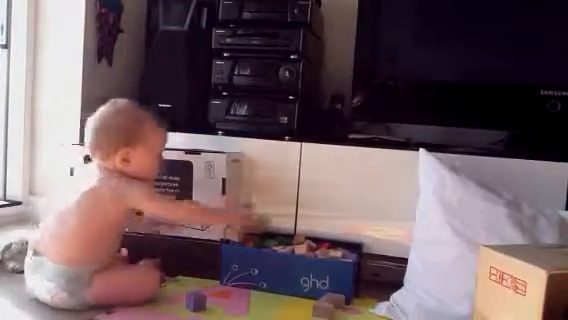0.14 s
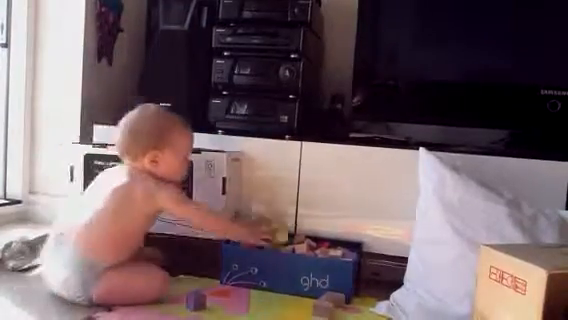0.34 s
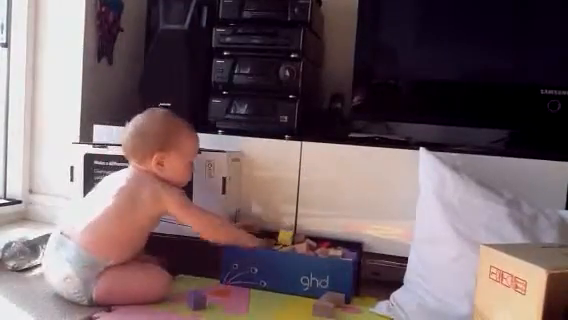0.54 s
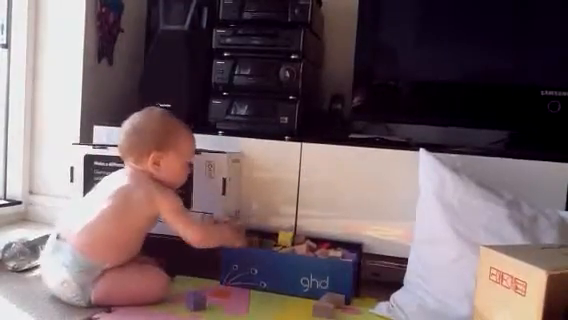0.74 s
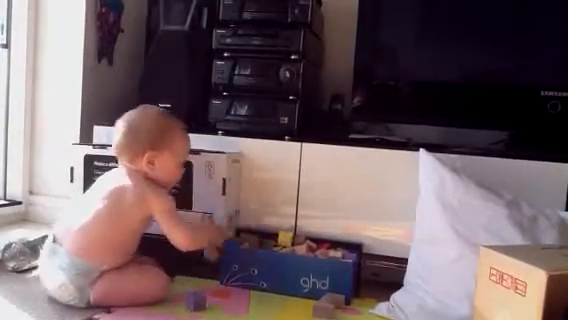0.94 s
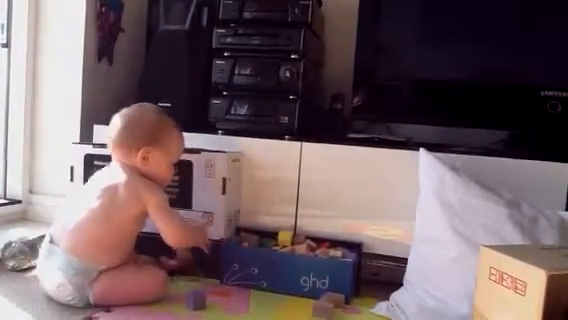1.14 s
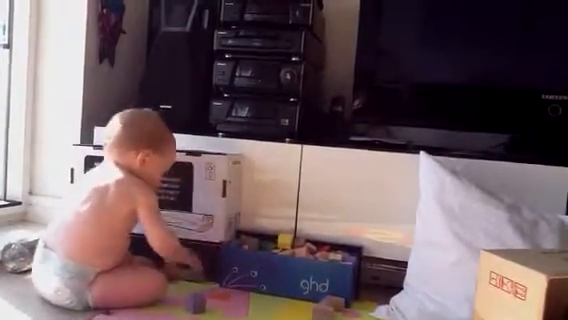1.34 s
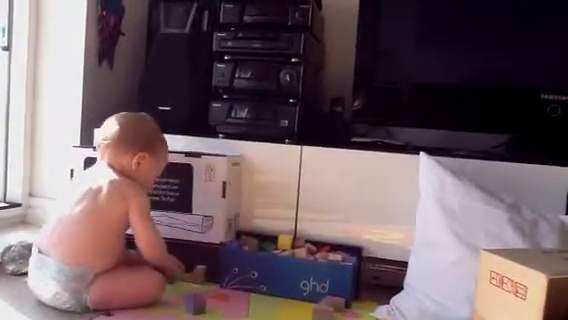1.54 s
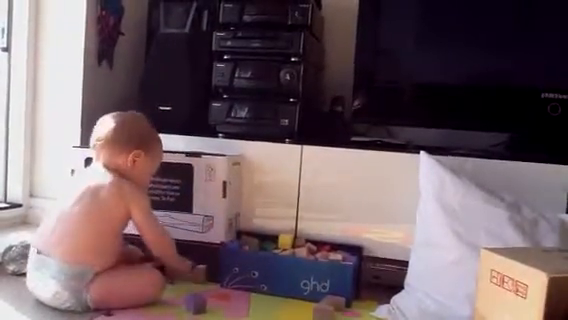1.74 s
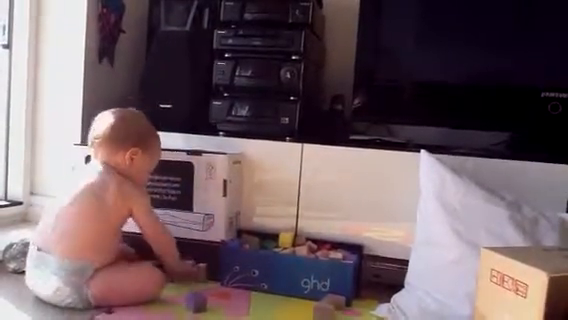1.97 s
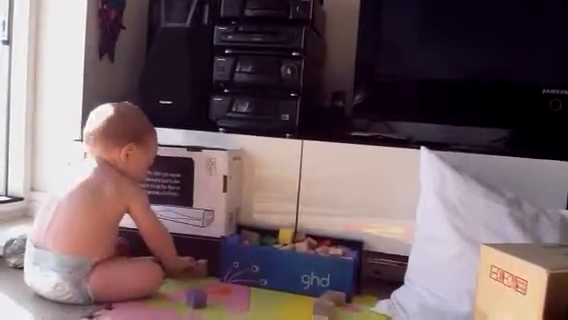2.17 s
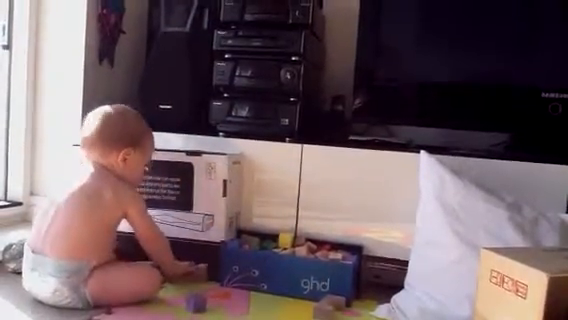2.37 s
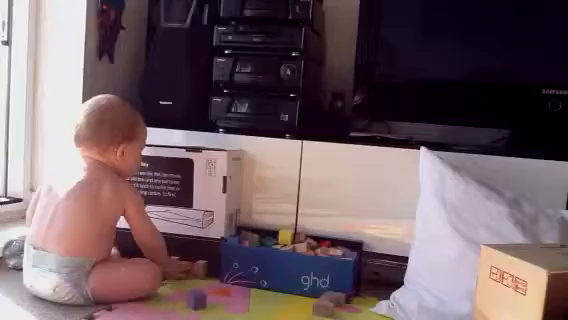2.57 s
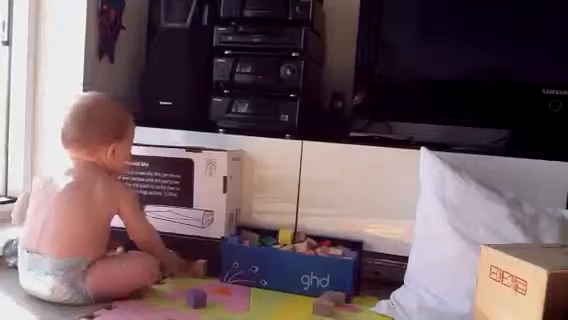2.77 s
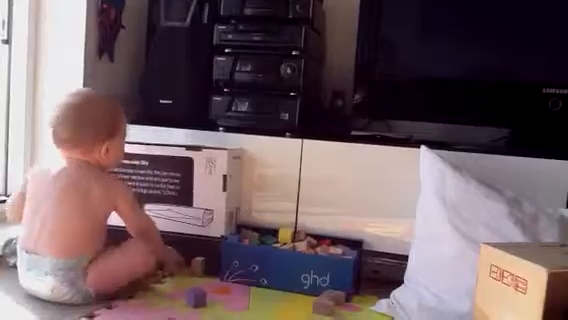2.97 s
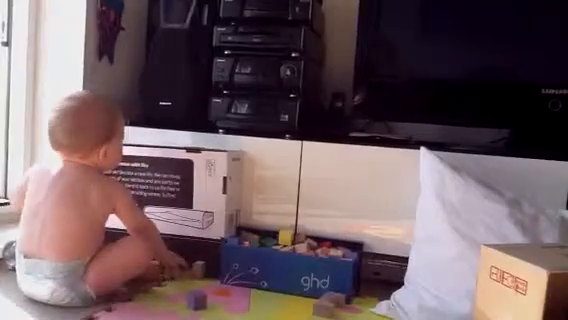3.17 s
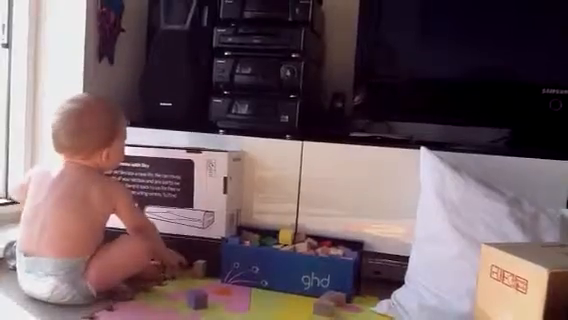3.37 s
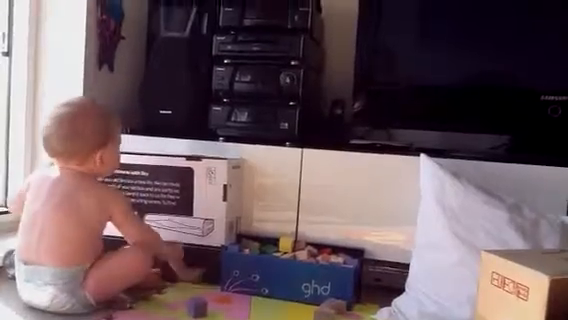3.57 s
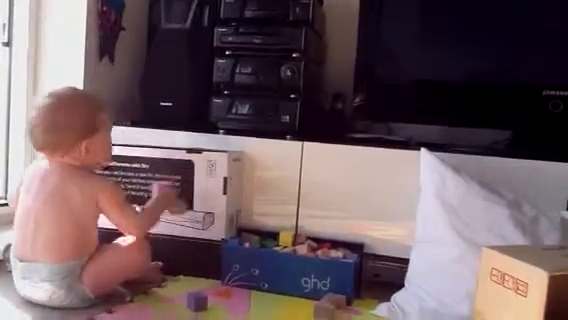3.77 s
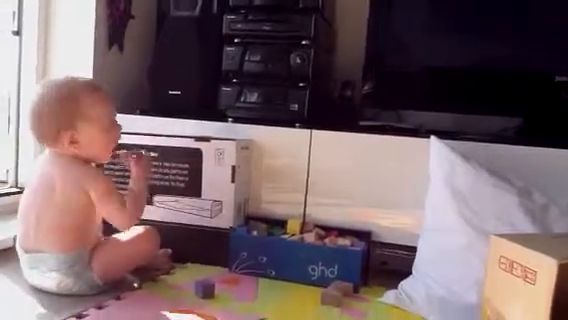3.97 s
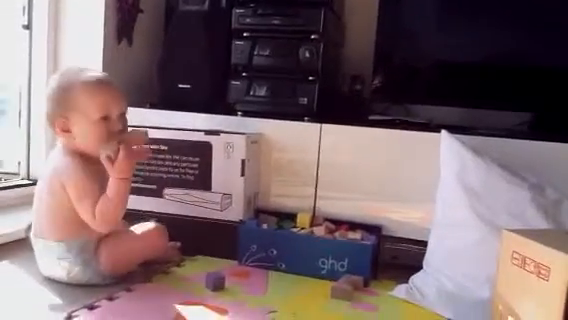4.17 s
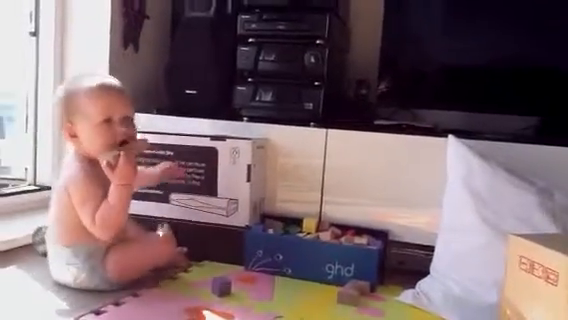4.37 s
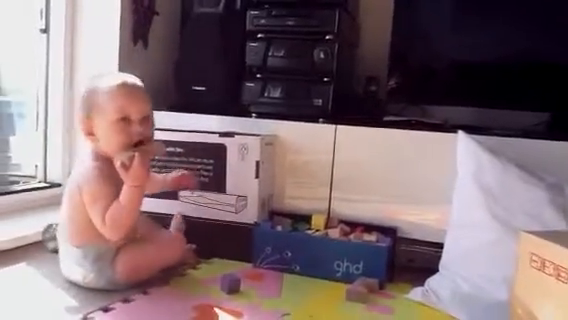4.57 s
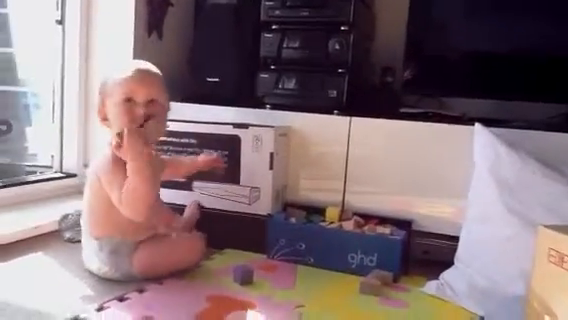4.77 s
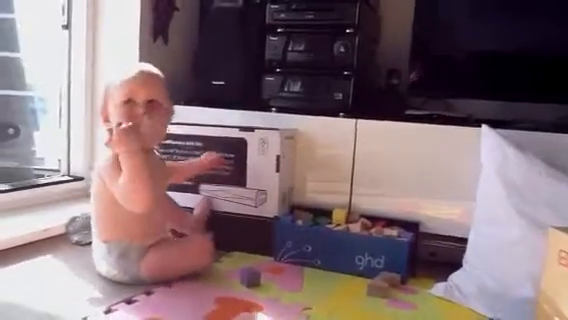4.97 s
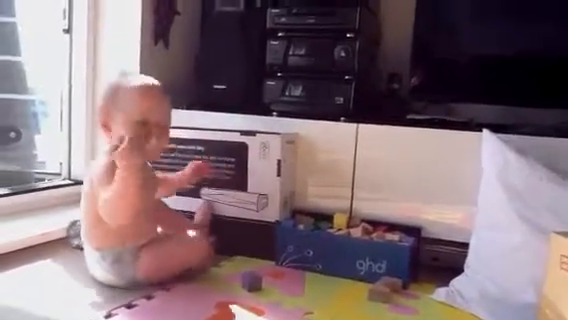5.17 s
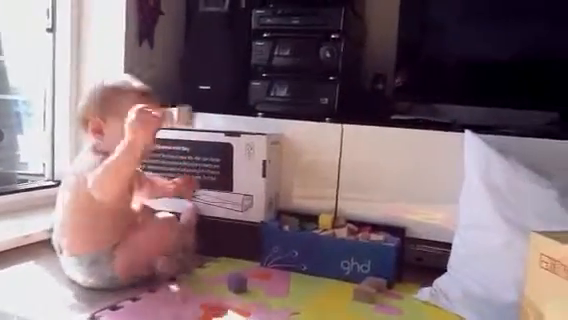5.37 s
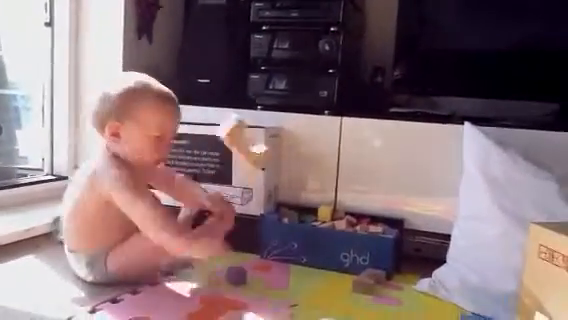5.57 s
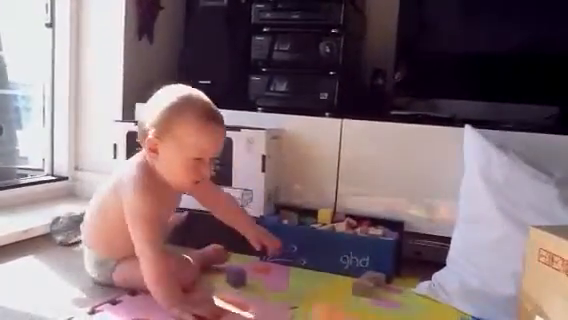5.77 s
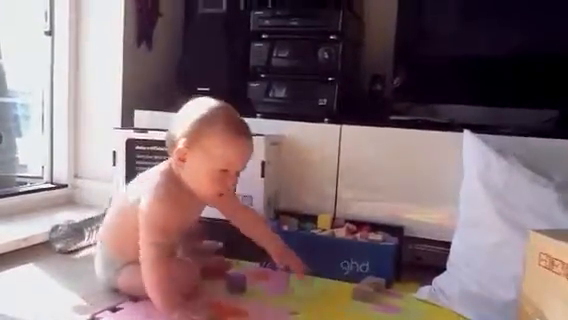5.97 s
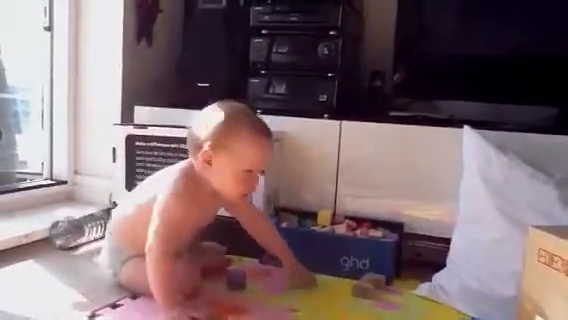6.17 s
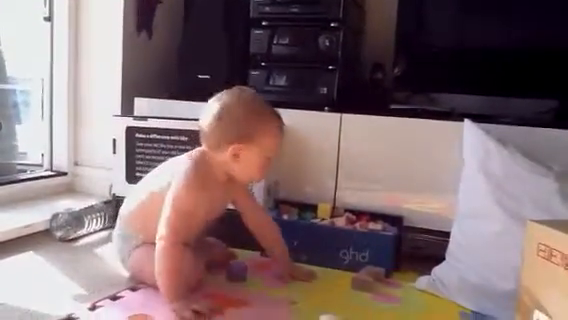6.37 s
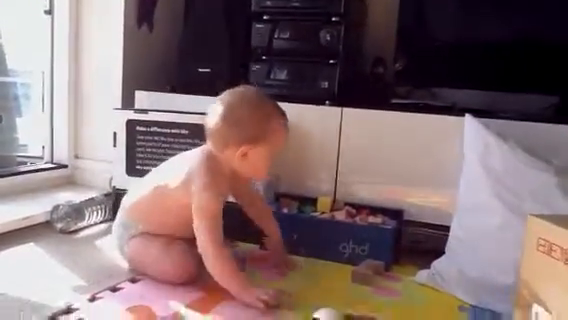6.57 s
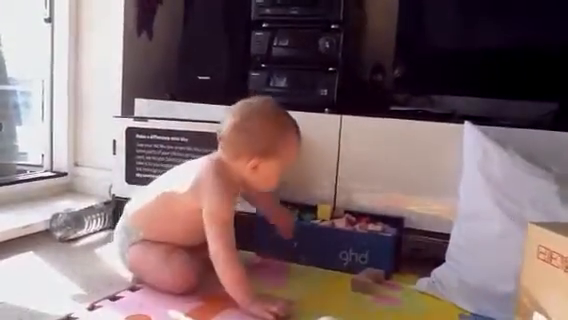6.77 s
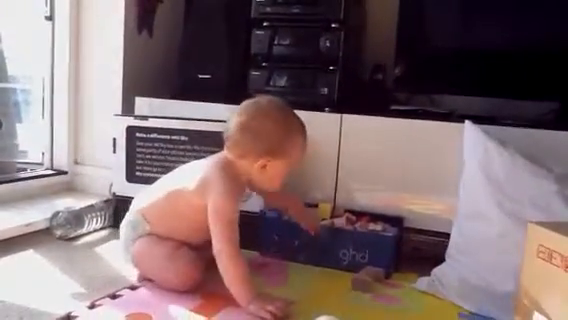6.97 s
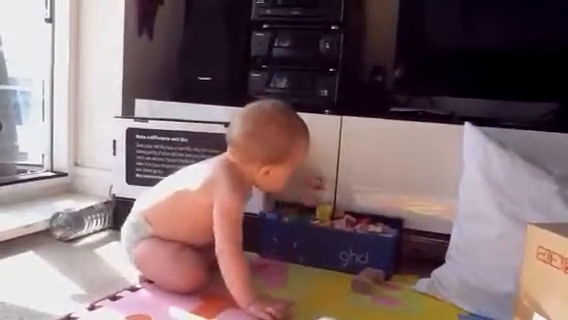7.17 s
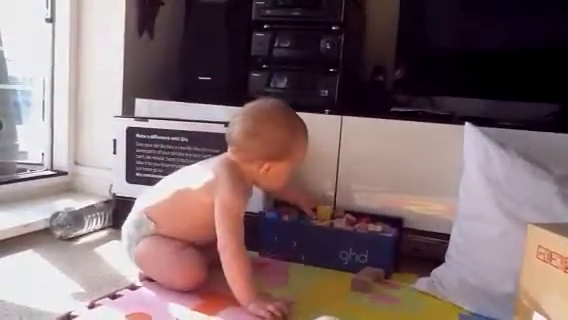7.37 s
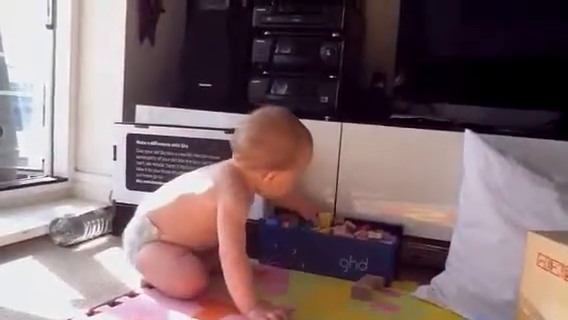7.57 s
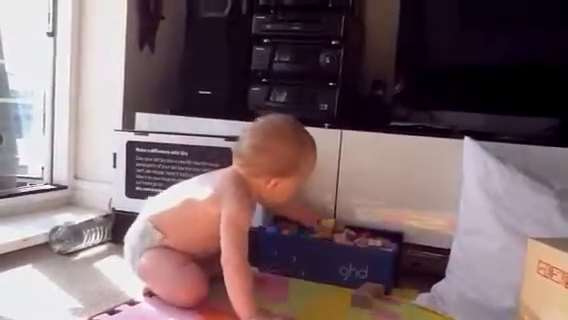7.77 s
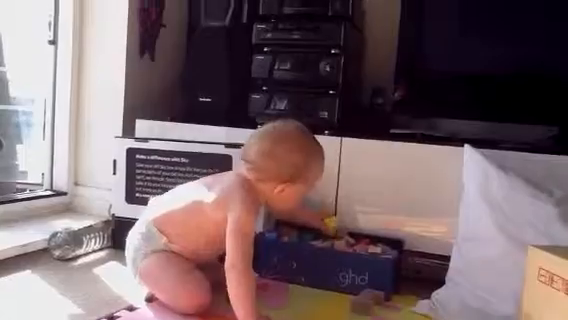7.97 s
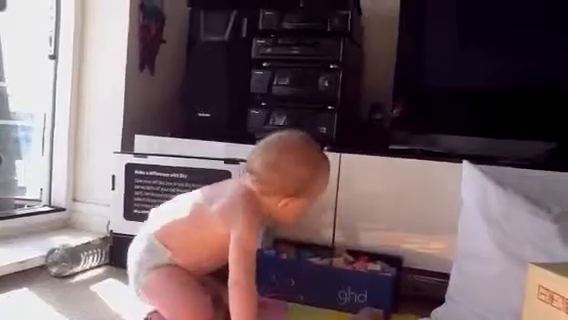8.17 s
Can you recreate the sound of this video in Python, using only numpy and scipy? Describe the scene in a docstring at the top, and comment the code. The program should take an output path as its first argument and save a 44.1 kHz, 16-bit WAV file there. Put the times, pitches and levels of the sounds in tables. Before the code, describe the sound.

Faint, slightly wavering room noise runs throughout, mono, from one small microphone in a furnished living room with a short diffuse tail. At 0.35 s a block knocks into a cardboard box with a hollow thud and a small settling rattle; light taps follow. Soft sliding and low bumps at 0.9-1.4 s lead to a sharp, bright crack at 1.5 s. From 2.0 to 3.8 s blocks are stirred busily, clicking in uneven clusters, strongest near 2.85 and 3.44 s, over muffled box rumble. A scuff and dull knock at 4.0 s give way to near silence, with barely audible rubbing. At 5.4 s a scrape and thud restart the play; hard clacks cluster at 5.5-5.85 s and peak, bright and dense, around 6.0 s. Rattling and crisp knocks continue until 7.45 s, then brief rubbing and duller, sparser knocks into the box to about 8.1 s.

```python
"""Faint, wavering room noise, then small wooden blocks pushed about, picked up and dropped
in a cardboard box and on a foam play mat. Blocks knock in very short clicks of decaying sines;
box and mat answer with low thuds. The shoved heap rattles and rumbles as grains in resonators;
hands and legs slide as filtered noise. A furnished living room rings on behind as a diffuse tail.
One small microphone feeds both channels."""
import sys
import numpy as np
from scipy import signal
from scipy.fft import rfft, irfft
from scipy.io import wavfile

SR = 44100
rng = np.random.default_rng(int(sys.argv[2]) if len(sys.argv) > 2 else 0)


def wrap_up_sound(samples):
    """Save the sound to the file named by the first command line argument, as 16-bit audio."""
    columns = np.atleast_2d(samples).T
    # keep every value between -1 and 1, then stretch to whole-number steps
    tamed = np.clip(columns, -1, 1)
    steps = np.round(tamed * 32767).astype(np.int16)
    wavfile.write(sys.argv[1], SR, steps)


N = 362502

# Block on block. Each row: time in seconds, dry peak in dB, base pitch in Hz,
# treble in dB (edge modes relative to body modes).
BLOCK_KNOCKS = [(0.2107, -32, 1940, -25), (0.3443, -11, 3850, -40), (0.3564, -22, 3970, -38),
                (0.3629, -22, 1500, -35), (0.3694, -21.5, 3950, -32), (0.4815, -29, 1650, -19),
                (0.8116, -43, 1540, -25), (0.9774, -30, 1620, -26), (1.3824, -22.5, 1330, -27),
                (1.5247, -4, 3300, -5), (1.5292, -9, 2900, -14), (1.5410, -19, 3000, -8),
                (1.5504, -19, 1705, -22), (1.6405, -30, 2500, -25), (1.7753, -32, 3280, -32),
                (1.7958, -31, 3150, -32), (1.851, -42, 3730, -36), (1.8884, -38, 3280, -36),
                (1.9407, -34.5, 2600, -24), (1.9762, -27, 2550, -26), (2.0018, -25, 3000, -21),
                (2.0357, -13.5, 2100, -14.5), (2.0424, -21, 2240, -16), (2.052, -14, 2180, -5),
                (2.0633, -18, 2510, -6), (2.0684, -19, 2710, -18), (2.0744, -17.5, 2880, -30),
                (2.1209, -13.5, 2310, -18), (2.1334, -11, 3000, -24), (2.1887, -18, 2470, -18),
                (2.2029, -11, 4080, -18), (2.2072, -14.5, 2500, -15), (2.2209, -13, 2490, -11),
                (2.2464, -24, 3140, -24), (2.2675, -11.5, 2220, -13), (2.384, -26, 2120, -25),
                (2.443, -25.5, 1310, -39), (2.5041, -24.5, 2050, -27), (2.5237, -22.5, 2200, -32),
                (2.5334, -21.5, 2200, -26), (2.589, -23, 2200, -30), (2.6028, -19, 2600, -37),
                (2.611, -19, 2150, -30), (2.6764, -13, 2530, -41), (2.7034, -12.5, 2730, -24),
                (2.7498, -23, 2500, -33), (2.8474, -7, 2300, -25), (2.8699, -7.5, 2000, -16),
                (2.8846, -10, 3680, -18), (2.8892, -11, 2230, -33), (2.9014, -19.5, 1910, -20),
                (2.9397, -18, 1810, -13), (3.109, -22.5, 2560, -34), (3.1406, -13.5, 4650, -27),
                (3.1589, -17, 2720, -21), (3.1837, -22, 2150, -29), (3.2123, -27, 3490, -23),
                (3.2268, -16.5, 3240, -22), (3.249, -9, 2160, -40), (3.2654, -17, 2010, -30),
                (3.2744, -17, 2000, -25), (3.2951, -20.5, 2480, -25), (3.373, -25, 1850, -32),
                (3.4176, -14, 1780, -26), (3.4274, -11.5, 2060, -28), (3.4334, -12, 2120, -18),
                (3.4407, -3.5, 3500, -12), (3.4499, -7.5, 2440, -8), (3.4624, -15, 1940, -30),
                (3.4675, -9.5, 2030, -30), (3.4734, -14.5, 2120, -29), (3.5226, -20.5, 1800, -13),
                (3.576, -25, 2180, -29), (3.6386, -15, 1940, -38), (3.6454, -18.5, 3300, -36),
                (3.7137, -12.5, 3600, -34), (3.7409, -26, 1800, -31), (3.7519, -28, 2900, -38),
                (3.7713, -23, 2630, -33.5), (3.7853, -23, 3620, -49), (3.8182, -27, 2030, -40),
                (4.0427, -13, 1500, -26), (5.3646, -23, 1450, -22), (5.4504, -34, 2160, -24),
                (5.5064, -8.5, 3570, -24.5), (5.5205, -17, 3250, -16), (5.574, -12.5, 3530, -30),
                (5.5815, -25.5, 1980, -25), (5.6035, -19, 2860, -27), (5.6817, -25, 1950, -34),
                (5.7249, -30, 5000, -12), (5.7388, -20, 2280, -36), (5.7535, -4.5, 2170, -25),
                (5.7552, -7, 2730, -17), (5.7684, -13, 2680, -27), (5.7738, -12, 2820, -26),
                (5.7793, -10.5, 2610, -30), (5.7984, -19, 2180, -14), (5.8074, -19, 3000, -12),
                (5.821, -14, 2300, -26), (5.8331, -9, 2560, -23), (5.8384, -14, 2870, -23),
                (5.8434, -19, 3010, -33), (5.8524, -17, 1890, -27), (5.8564, -17, 2620, -32),
                (5.8614, -22, 1890, -28), (5.9604, -23, 3200, -12), (5.9702, -11, 3600, -13),
                (5.982, -11, 2870, -11), (5.9985, -14, 2700, -25), (6.0063, -10, 4300, -12),
                (6.0128, -11, 2840, -3), (6.0198, -6, 3000, -14), (6.0305, -2.5, 3000, -9),
                (6.0424, -5, 3600, -13), (6.051, -12, 3400, -14), (6.069, -18, 3240, -14),
                (6.2104, -24, 3560, -22), (6.2147, -18, 3430, -19), (6.228, -15, 4230, -6),
                (6.2374, -16, 2400, -12), (6.241, -9.5, 3670, -14), (6.2454, -16, 3530, -13),
                (6.2544, -18, 3500, -21), (6.3018, -8, 3380, -10.5), (6.3734, -26, 2470, -25),
                (6.3863, -23.5, 3750, -19), (6.4178, -26, 2520, -27), (6.4228, -14, 3600, -35),
                (6.4354, -22, 2930, -14), (6.5061, -19, 4180, -12), (6.5485, -24.5, 2440, -17),
                (6.5859, -19, 2860, -18.5), (6.6763, -17, 3600, -37), (6.6844, -23, 3680, -24),
                (6.7306, -25, 1890, -17), (6.791, -22, 3300, -21), (6.8064, -16.5, 3470, -21),
                (6.8154, -22, 2690, -17), (6.8551, -15, 3800, -20), (6.8648, -14.5, 3500, -3),
                (6.8696, -12.5, 5200, -4), (6.8836, -12.5, 3930, -29), (6.9443, -18, 4600, -12),
                (7.008, -13.5, 3240, -17), (7.0868, -26, 2200, -33), (7.1496, -26, 3050, -22),
                (7.1803, -12.5, 2930, -3), (7.1862, -19, 2500, -20), (7.2164, -18.5, 5280, -12),
                (7.2777, -18, 2800, -33), (7.2824, -15.5, 2500, -28), (7.2862, -18, 3300, -12),
                (7.2918, -10.5, 2340, -14), (7.2972, -15, 3660, -22), (7.3494, -24, 4500, -23),
                (7.4081, -16.5, 3120, -34), (7.4345, -21, 2200, -18), (7.4434, -21.5, 2270, -32),
                (7.6164, -31, 1780, -36), (7.6862, -23, 1460, -27), (7.6994, -28, 1410, -31),
                (7.7989, -21.5, 1900, -31), (7.8386, -31, 1610, -28.5), (7.873, -25, 1630, -33),
                (7.897, -18.5, 3000, -37), (7.9064, -21, 2970, -33), (7.9423, -12.5, 3300, -34),
                (7.982, -22, 3840, -22), (7.998, -24, 2020, -30), (8.0083, -15.5, 2070, -33),
                (8.0676, -31, 1670, -37), (8.1279, -37.5, 2070, -29)]
# Thickness modes of the wood, woken by hard contacts. Each row: mean frequency in Hz, relative level in dB.
EDGE_MODES = [(4900, -1), (5800, 3), (6700, -4), (8300, 3.5), (9500, -2), (11700, 4), (14300, -1.5)]
# As the play moves about. Each row: time in seconds, room send in dB,
# ringing freedom as a factor (1 usual, less when held down on foam).
PLAY_PLACES = [(0, 4.5, 1.2), (1.76, 0, 1.1), (2.0, 6, 1.2), (2.4, 0.5, .95), (3.55, -1.5, .95),
               (4.1, -11.5, 1.1), (5.3, 4, 1.1), (5.5, -12, 1.4), (5.66, 0, 1.9), (7.55, 4.5, 1.1),
               (8.22, -5.5, .9)]

EDGE_CYCLES = 28.0   # to die by 60 dB


def from_db(db):
    """Amplitude ratio of a level in dB."""
    return 10 ** (np.asarray(db) / 20)


def rms_one(x):
    """Scale to unit rms."""
    return x / np.sqrt(np.mean(x ** 2) + 1e-20)


def at_hz(points, hz, axis=1):
    """Interpolate a table column over log frequency."""
    points = np.array(points)
    return np.interp(np.log(hz), np.log(points[:, 0]), points[:, axis])


def in_time(rows):
    """Interpolate the columns after the first over every sample time."""
    s, *columns = np.transpose(rows)
    return [np.interp(np.arange(N) / SR, s, column) for column in columns]


def butter(x, hz, kind, order=2):
    """Butterworth filter."""
    return signal.sosfilt(signal.butter(order, hz, kind, fs=SR, output="sos"), x)


def drift(knots_per_s):
    """Random wander: straight lines between normal knots of spread 1."""
    knots = rng.standard_normal(2000)
    return np.interp(np.arange(N) / SR * knots_per_s, np.arange(2000), knots)


def hush():
    """Room and microphone noise: steady, wavering a little, its bass and treble apart."""
    # Noise spectrum. Each row: frequency in Hz, relative density in dB per Hz.
    noise_spectrum = [(24, -54), (40, -28), (130, -1), (320, 0.5), (382, -1.5), (751, -8.5), (1070, -11.5),
                      (1240, -12), (3220, -18.5), (12100, -25.5), (14800, -24), (16000, -36)]
    mean_level_db = -55.5   # about which it wavers
    hz = np.arange(1, N // 2 + 2) * SR / N
    white = rfft(rng.standard_normal(N))
    noise = rms_one(irfft(white * from_db(at_hz(noise_spectrum, hz)), N))
    bass = butter(noise, 1020, "low")
    treble = noise - bass
    bass_waver = from_db(0.5 * drift(2.53))
    treble_waver = from_db(0.48 * drift(8.9))
    return from_db(mean_level_db) * (bass * bass_waver + treble * treble_waver)


def strikes(times_s, peak_db, hz, mode_db, cycles, press_cycles, band_hz, size, spread_db):
    """Each blow (row) rings decaying sine modes (columns) of random strength, scaled to its peak."""
    turns = hz[..., None] * np.arange(size) / SR
    strength = from_db(mode_db + spread_db * rng.standard_normal(hz.shape))[..., None]
    swell = (1 - np.exp(-turns / press_cycles)) ** 2   # the contact takes part of a cycle to press
    decay = from_db(-60 * turns / cycles[..., None])
    waves = (strength * swell * np.sin(2 * np.pi * turns) * decay).sum(1)
    waves = butter(waves, band_hz, "band")   # what radiates
    waves *= from_db(peak_db)[:, None] / np.abs(waves).max(1, keepdims=True)
    out = np.zeros(N + SR)
    starts = (times_s * SR).astype(int)
    np.add.at(out, starts[:, None] + np.arange(size), waves)
    return out[:N]


def knocks():
    """Body modes follow block size, edge modes contact hardness; three weaker touches follow each knock."""
    # Body modes of a block, the first two the bare crack of the contact. Each row: multiple of
    # its pitch, relative level in dB, cycles to die by 60 dB at ringing freedom 1.
    body_modes = [(.4, -7, 2.0), (1.15, 3, 2.5), (.72, -7, 5.0), (1.001, 0.0, 8), (1.28, -3, 7),
                  (1.62, -5.5, 6), (2.05, -10, 6)]
    delay_s = .0007   # short delay from the listed time to the start of the knock
    chatter_mean_s, chatter_max_db = .002, -7.5   # a block rocks on; level before the room term
    chatter_dull_db = -10    # softer contacts lose treble
    crack_fade_db = 11       # per doubling of ringing freedom

    s, peak_db, pitch_hz, treble_db = np.repeat(BLOCK_KNOCKS, 4, axis=0).T
    repeat = np.arange(len(s)) % 4 > 0
    luck = rng.random((len(s), 3))
    s = s + delay_s - repeat * chatter_mean_s * np.log(luck[:, 0])
    place_s, send_db, freedom = np.transpose(PLAY_PLACES)
    free = np.interp(s, place_s, freedom)[:, None]
    neighbours_db = 0.75 * np.interp(s, place_s, send_db)   # fewer neighbours outside the box
    peak_db = peak_db + repeat * (chatter_max_db - 10 * luck[:, 1] + neighbours_db)
    pitch_hz = pitch_hz * (1 + repeat * (luck[:, 2] - .4) * 0.59)   # another face, another neighbour
    treble_db = treble_db + repeat * chatter_dull_db

    multiple, body_db, body_cycles = np.transpose(body_modes)
    edge_hz, edge_db = np.transpose(EDGE_MODES)
    edge_hz = edge_hz * (1 + .07 * rng.standard_normal((len(s), len(EDGE_MODES))))
    is_crack = body_cycles < 3
    body_db = body_db - crack_fade_db * np.log2(free) * is_crack
    hz = np.hstack([np.outer(pitch_hz, multiple), edge_hz])
    mode_db = np.hstack([body_db, np.add.outer(treble_db, edge_db)])
    cycles = np.hstack([body_cycles * free, np.full(edge_hz.shape, EDGE_CYCLES)])
    spread_db = np.repeat([3.0, 4.0], [len(body_modes), len(EDGE_MODES)])
    return strikes(s, peak_db, hz, mode_db, cycles, press_cycles=0.35,
                   band_hz=[700, 14000], size=600, spread_db=spread_db)


def thuds():
    """Cardboard and foam ring low; light blows press in slowly and swell gently."""
    # Blows on box and mat. Each row: time in seconds (light blows start earlier to swell),
    # dry peak in dB, base pitch in Hz, cycles to die by 60 dB.
    box_blows = [(0.2108, -20, 300, 5), (0.3443, -10, 600, 8), (0.3581, -14, 620, 8),
                 (0.4577, -23.5, 600, 7), (0.4798, -27, 400, 5), (0.514, -22.5, 517, 8),
                 (0.691, -26, 490, 7), (0.7226, -30.5, 557, 8), (0.764, -35.5, 300, 7),
                 (0.928, -31, 650, 7), (0.979, -19.5, 514, 8), (0.9971, -26.5, 240, 8),
                 (1.093, -31, 141, 7), (1.1909, -17.5, 347, 7), (1.208, -20.5, 286, 8),
                 (1.3841, -17.5, 375, 7), (1.3885, -18.5, 396, 7), (1.5233, -24, 400, 4),
                 (1.5608, -27, 500, 4), (1.7887, -38.5, 223, 6), (2.8478, -25, 520, 3),
                 (2.871, -28, 400, 3), (2.972, -38, 280, 6), (3.155, -29, 450, 3), (3.4386, -23, 397, 6),
                 (3.4547, -21, 405, 7), (3.5242, -24, 415, 7), (3.9375, -35, 273, 6), (3.9673, -31, 536, 4),
                 (4.0438, -16, 340, 5), (4.895, -32, 200, 4), (5.3655, -16, 410, 3), (5.416, -36, 400, 5),
                 (5.482, -39, 480, 7), (5.701, -30, 200, 5), (5.7998, -30, 151, 6), (5.8308, -25, 146, 6),
                 (5.979, -31, 202, 6), (6.8384, -22, 630, 7), (6.8468, -16, 563, 7), (6.8533, -20, 600, 7),
                 (6.8844, -27, 534, 6), (7.1393, -28, 507, 6), (7.2647, -29, 264, 5),
                 (7.277, -29.5, 168, 6), (7.465, -26, 567, 11), (7.8725, -29, 544, 3),
                 (7.8968, -23, 534, 3), (7.9165, -22, 450, 3), (8.009, -25, 515, 3), (8.036, -30.5, 425, 4)]
    # Box wall and mat modes. Each row: multiple of the pitch, relative level in dB.
    box_modes = [(.62, 2), (1.001, 12.5), (1.4, 7.5), (1.9, 0.5), (2.7, -6.5)]
    soften_cycles_per_db = .025   # for blows below -14 dB
    s, peak_db, pitch_hz, cycles = np.transpose(box_blows)
    multiple, mode_db = np.transpose(box_modes)
    soft_cycles = soften_cycles_per_db * np.clip(-14 - peak_db, 0, 30)
    return strikes(s - soft_cycles / pitch_hz, peak_db, np.outer(pitch_hz, multiple), mode_db,
                   np.clip(cycles, 2, 20)[:, None], press_cycles=0.4 + soft_cycles[:, None, None],
                   band_hz=[100, 4000], size=4000, spread_db=4.0)


def ring(clicks, hz, t60_s):
    """Two-pole resonator: a unit click sets a sine of height 1 ringing."""
    r = from_db(-60 / (t60_s * SR))
    w = 2 * np.pi * min(hz, .45 * SR) / SR
    return signal.lfilter([0, np.sin(w)], [1, -2 * r * np.cos(w), r * r], clicks + 1e-18)


def grains(median_per_s, pitches_hz, cycles, spread_db, dealt=None):
    """Uneven small contacts, dealt to resonators, at random unless told; rms 1."""
    sizes = from_db(spread_db * np.minimum(rng.exponential(1, N), 4)) * rng.choice([-1, 1], N)
    born = rng.random(N) < median_per_s * from_db(4.0 * drift(40)) / SR
    if dealt is None:
        dealt = rng.integers(0, len(pitches_hz), N)
    clicks = sizes * born
    return rms_one(sum(ring(clicks * (dealt == k), hz, cycles / hz) for k, hz in enumerate(pitches_hz)))


def shoves(*columns):
    """Envelope: every shove swells fast and dies away at its own pace; the powers add up."""
    # The heap is shoved and settles. Each row: peak time in seconds, rattle level in dB,
    # treble in dB relative to the rattle, rumble level in dB, time to settle by 30 dB in seconds.
    heap_shoves = [(0.368, -33, -22, -57, 0.36), (1.1, -61, 4, -45.5, 0.56), (1.4, -44.5, -7, -30.5, 0.01),
                   (1.538, -30, -7, -39, 0.1), (1.79, -52, -31, -71, 0.5), (2.045, -33.5, -5, -58, 0.22),
                   (2.205, -35, -4, -58, 0.37), (2.599, -37.5, -16, -45, 0.15), (2.7, -35, -19, -50, 0.28),
                   (2.857, -31, -11.5, -47, 0.24), (3.138, -33, -20, -44.5, 0.35),
                   (3.27, -43, -16, -49, 0.6), (3.439, -29, -12, -38.5, 0.2832), (3.64, -50, -12, -43, .5),
                   (3.999, -54, -10, -39, 0), (5.41, -60, -10, -37.5, 0.22), (5.59, -40.5, -15, -45, 0.4),
                   (5.78, -31, -12, -35, 0.12), (5.988, -26.5, -8, -47, 0.08), (6.03, -25, -4, -55, 0.13),
                   (6.24, -41, -3, -51.5, 0.16), (6.32, -38, -9, -58, 0.1), (6.44, -39.5, -6.5, -60, 0.5),
                   (6.7, -44.5, -13, -67, 1.5), (6.8, -34.5, -14, -62, 0.34), (6.86, -35.5, -4.5, -64, .5),
                   (7.02, -43.5, -13, -72, 0.46), (7.187, -31.5, -8, -65, 0.11),
                   (7.282, -31, -10, -50, .07), (7.3, -44, -3, -61, .5), (7.68, -43.5, -16, -51, .5),
                   (7.929, -34.5, -18, -54, 0.2)]
    gather_s = 0.035   # for the last 30 dB of the swell
    step = 64          # samples
    rows = np.array(heap_shoves)
    late_s = np.arange(0, N, step)[:, None] / SR - rows[:, 0]
    fall_db = -30 * np.where(late_s < 0, -late_s / gather_s, late_s / rows[:, -1])
    power = (from_db(fall_db + rows[:, columns].sum(1)) ** 2).sum(1)
    return np.interp(np.arange(N), np.arange(0, N, step), np.sqrt(power))


def stirring():
    """Blocks shifting in the heap tick against each other, around the pitch of the listed knocks."""
    rattles_per_s = 1000   # median, for body and edge each
    body_cycles = 15.0     # to die by 60 dB
    spread_octaves = .6
    pitches_hz = np.geomspace(1100, 6600, 28)
    near_hz = in_time(BLOCK_KNOCKS)[1] * 2 ** (spread_octaves * rng.standard_normal(N))
    dealt = np.searchsorted(pitches_hz[:-1], near_hz)
    body = grains(rattles_per_s, pitches_hz, body_cycles, spread_db=4.0, dealt=dealt)
    body = butter(body, [1000, 7000], "band")
    edge = grains(rattles_per_s, [hz for hz, db in EDGE_MODES], EDGE_CYCLES, spread_db=1.5)
    edge = butter(edge, [4500, 12500], "band")
    return shoves(1) * body + shoves(1, 2) * edge


def rumble():
    """Cardboard and foam drum softly under every shove: grains in low resonators."""
    box = grains(400, np.geomspace(140, 900, 9), cycles=6.0, spread_db=4.0)
    return shoves(3) * butter(box, 1800, "low")


def slides():
    """Smooth friction hiss that swells over each stroke and stops short."""
    # Skin and cloth on the mat. Each row: start in seconds, end in seconds,
    # hiss rms in dB before the stroke envelope, low-pass corner in Hz.
    mat_slides = [(0.924, 1.02, -49, 9000), (0.928, 1.33, -50.5, 3000), (1.09, 1.197, -54, 9000),
                  (1.232, 1.329, -41.5, 3400), (1.376, 1.524, -46.5, 9000), (3.933, 4.036, -40.5, 6000),
                  (4.447, 4.954, -62.5, 1800), (4.915, 5.0, -62, 14000), (5.148, 5.393, -65, 1800),
                  (5.336, 5.442, -34.5, 6700), (5.69, 5.75, -35.5, 3000), (7.267, 7.29, -32, 3530),
                  (7.58, 7.628, -42, 2170), (7.645, 7.775, -39.5, 2300)]
    out = np.zeros(N)
    for start_s, end_s, level_db, dull_hz in mat_slides:
        a, b = int(start_s * SR), int(end_s * SR)
        hiss = butter(rng.standard_normal(SR), dull_hz, "low")
        hiss = rms_one(butter(hiss, 300, "high", order=1))[:b - a]
        stroke = np.hanning(b - a) ** 0.35 * np.linspace(.5, 1, b - a)
        out[a:b] += from_db(level_db) * hiss * stroke
    return out


def room(x):
    """The direct sound, then a diffuse noise tail that fades in and dies band by band."""
    # Reverberation. Each row: frequency in Hz, 60 dB decay time in seconds, relative level in dB.
    room_decay = [(120, 0.62, -26), (300, 0.26, -12.5), (700, 0.3, -10.5), (1500, 0.28, -14),
                  (3000, 0.35, -12), (6000, 0.36, -12.5), (11300, 0.3, -18.5)]
    gap_s = .006   # the far walls answer late
    size = int(.7 * SR)
    t = np.arange(size) / SR
    tail = np.zeros(size)
    edges_hz = 90 * 2 ** np.arange(0, 7.6, .5)
    for low, high in zip(edges_hz, edges_hz[1:]):
        hz = np.sqrt(low * high)
        band = butter(rng.standard_normal(size), [low, high], "band")
        t60_s, level_db = at_hz(room_decay, hz, axis=1), at_hz(room_decay, hz, axis=2)
        tail += band * from_db(level_db - 60 * t / t60_s)
    tail *= np.clip(t / gap_s, 0, 1) ** 2 / np.sqrt(SR / 100)
    send = x * from_db(in_time(PLAY_PLACES)[0])
    return x + signal.fftconvolve(send, tail)[:N]


def scene():
    """All contacts pass through the room and a bass cut; one microphone feeds both channels."""
    contacts = knocks() + thuds() + stirring() + rumble() + slides()
    near = butter(room(contacts), 158, "high", order=3)
    return np.tile(near + hush(), (2, 1))


def record(dry):
    """Soft saturation rounds the loudest peaks; a steep low-pass cuts the top."""
    rounded = .9 * np.tanh(dry / .9)
    top_cut = signal.cheby2(16, 100, 16200, fs=SR, output="sos")   # 100 dB down from 16200 Hz
    return signal.sosfilt(top_cut, rounded)


dry = scene()
out = record(dry)
wrap_up_sound(out)
```